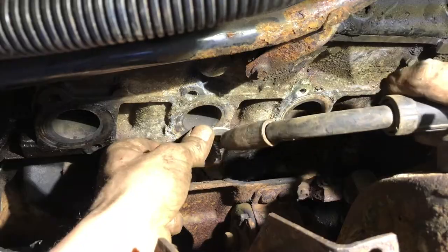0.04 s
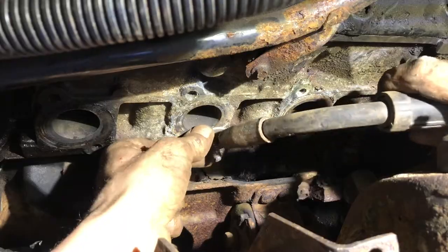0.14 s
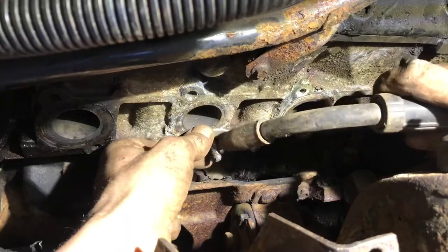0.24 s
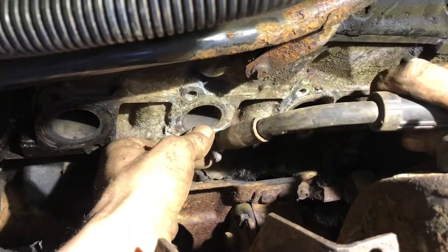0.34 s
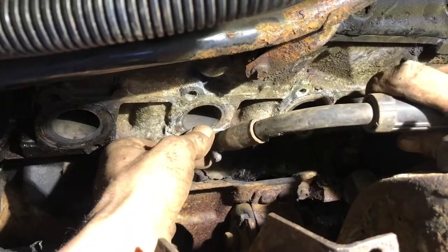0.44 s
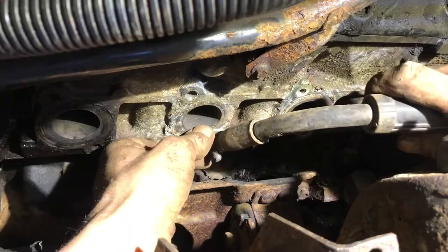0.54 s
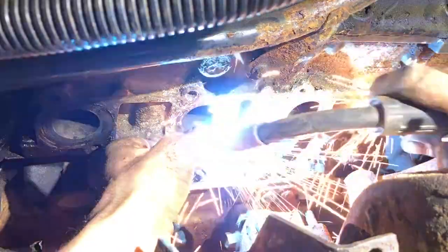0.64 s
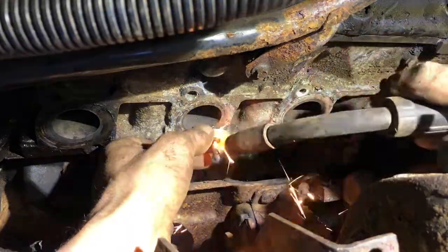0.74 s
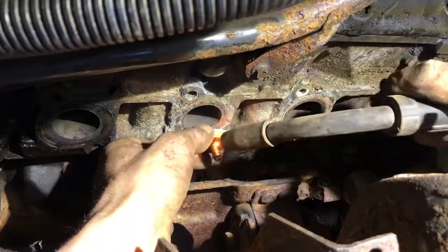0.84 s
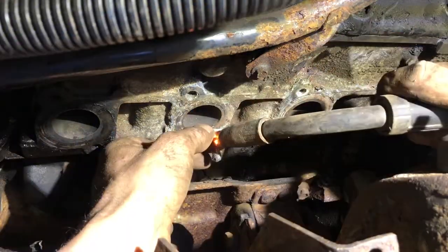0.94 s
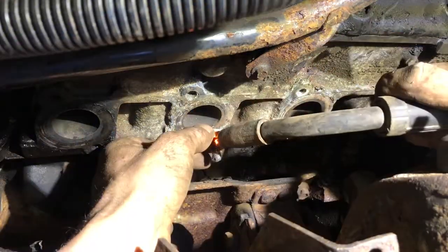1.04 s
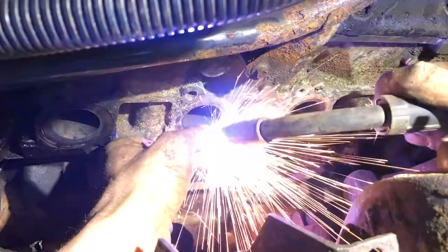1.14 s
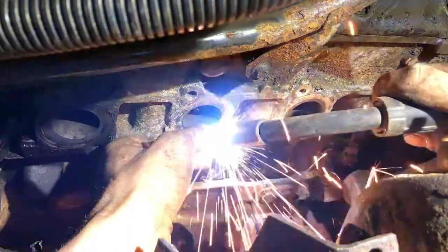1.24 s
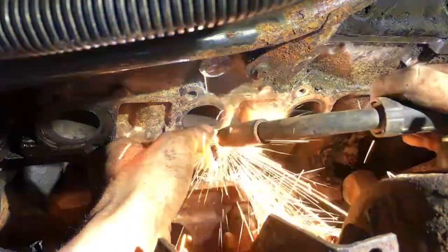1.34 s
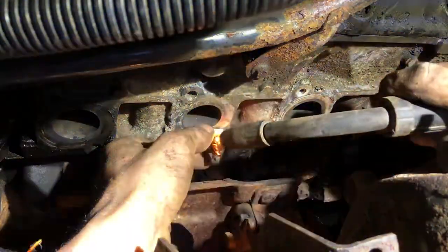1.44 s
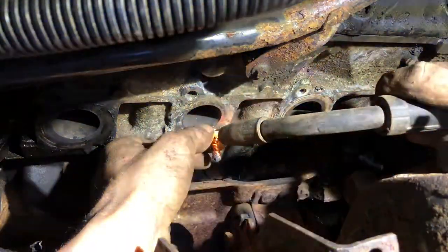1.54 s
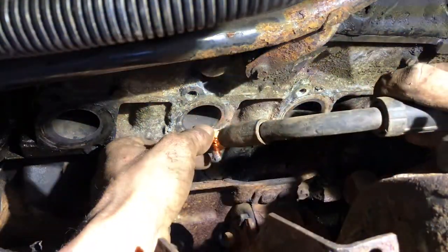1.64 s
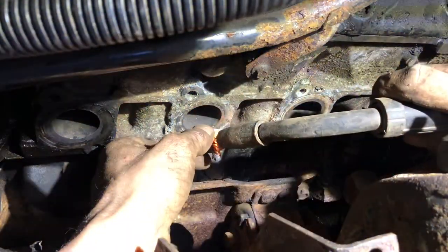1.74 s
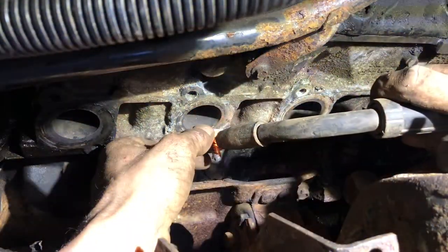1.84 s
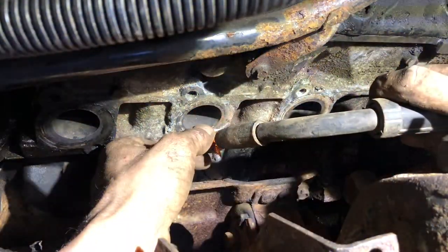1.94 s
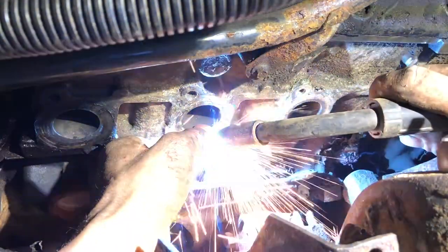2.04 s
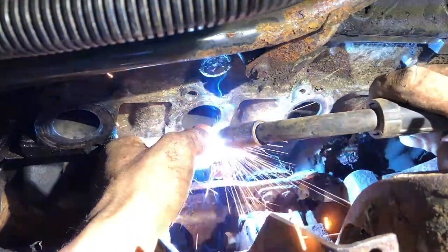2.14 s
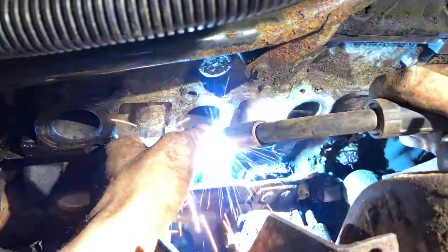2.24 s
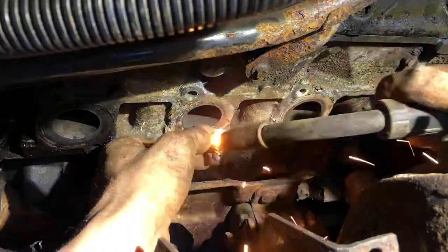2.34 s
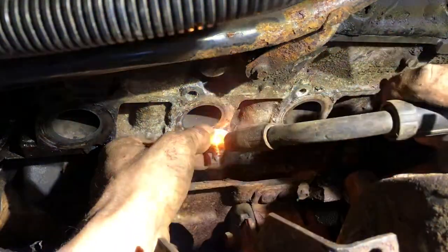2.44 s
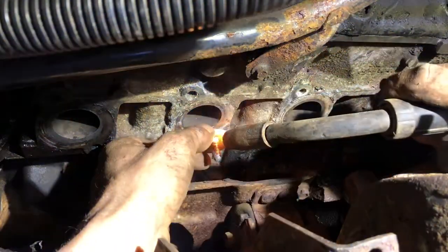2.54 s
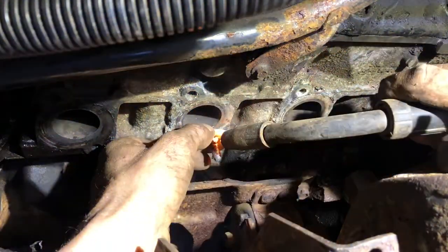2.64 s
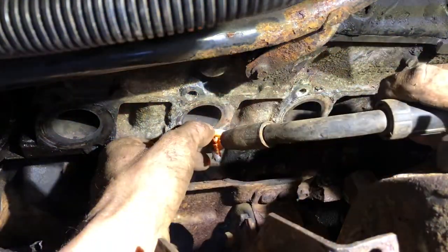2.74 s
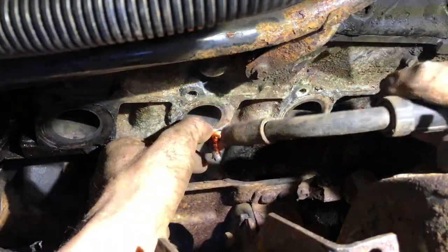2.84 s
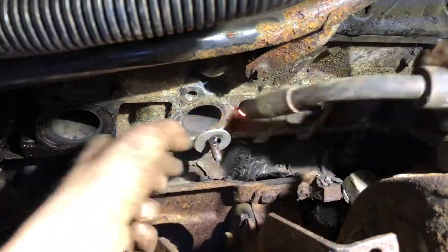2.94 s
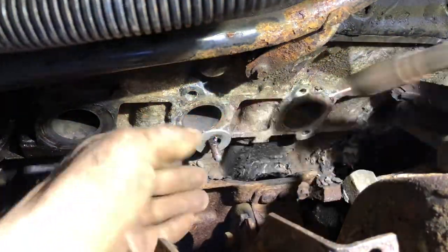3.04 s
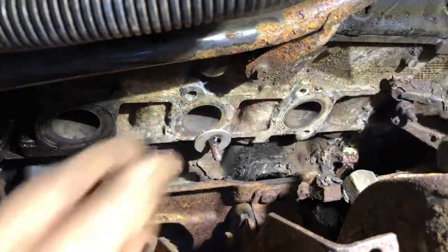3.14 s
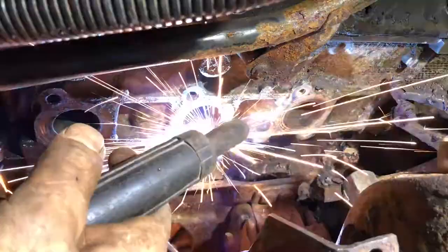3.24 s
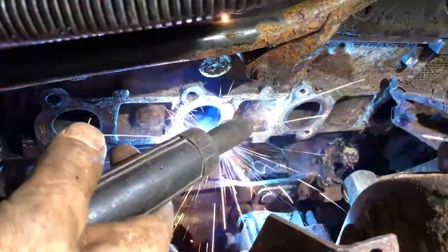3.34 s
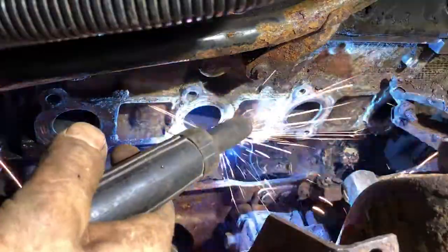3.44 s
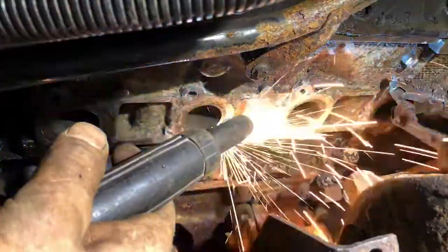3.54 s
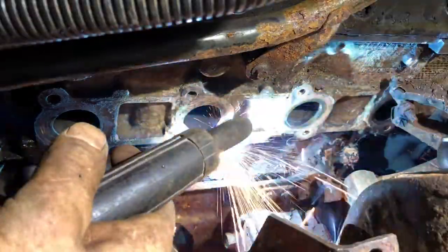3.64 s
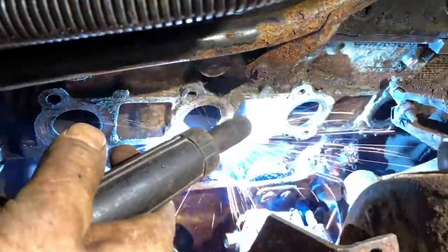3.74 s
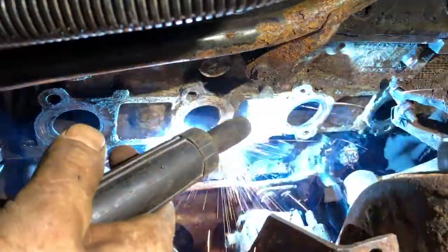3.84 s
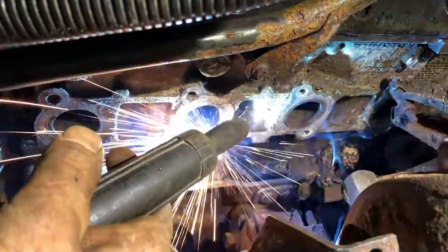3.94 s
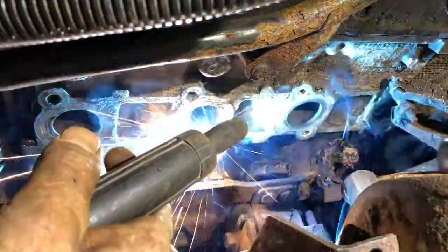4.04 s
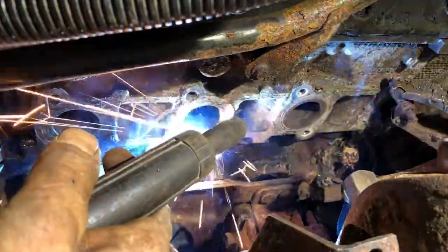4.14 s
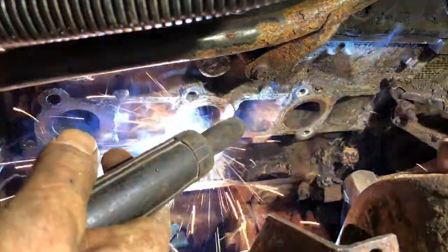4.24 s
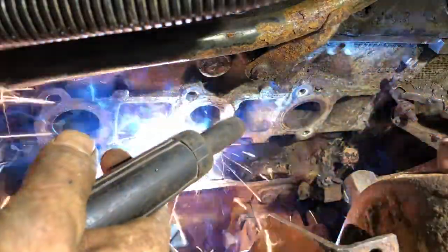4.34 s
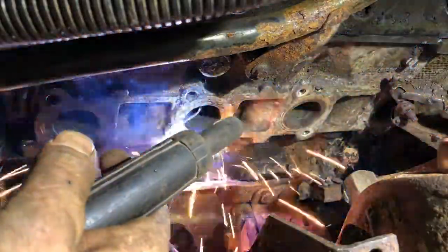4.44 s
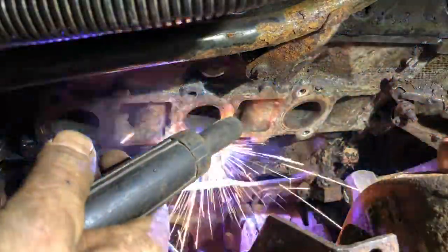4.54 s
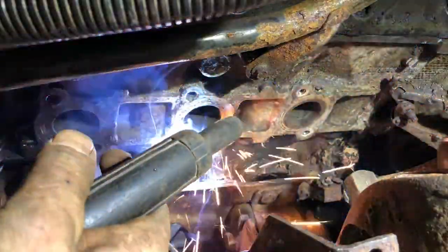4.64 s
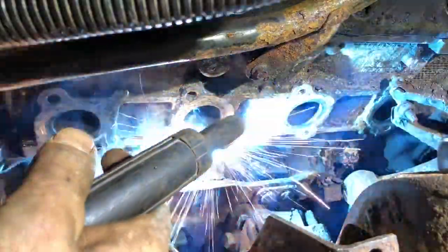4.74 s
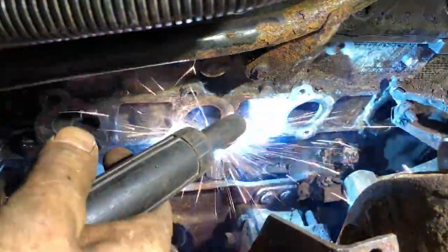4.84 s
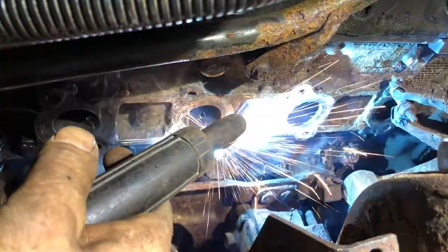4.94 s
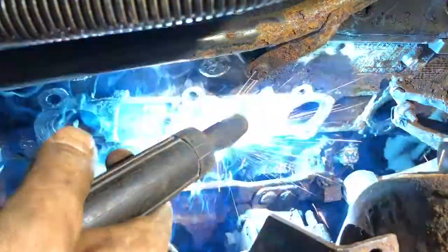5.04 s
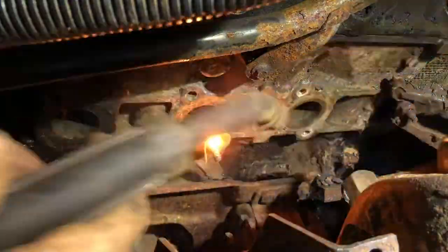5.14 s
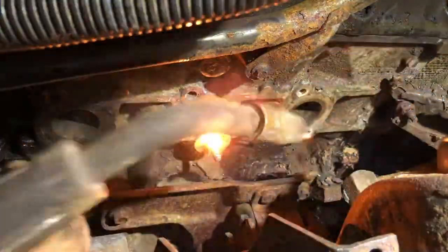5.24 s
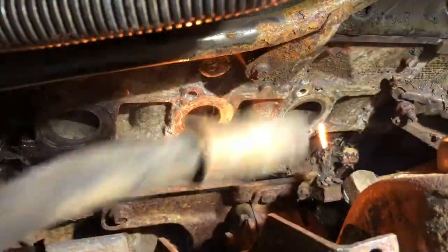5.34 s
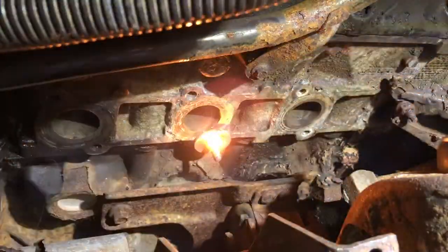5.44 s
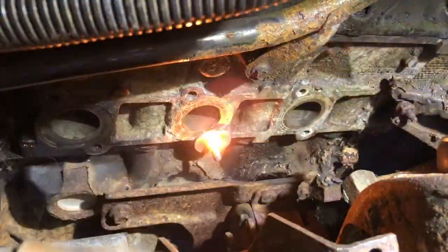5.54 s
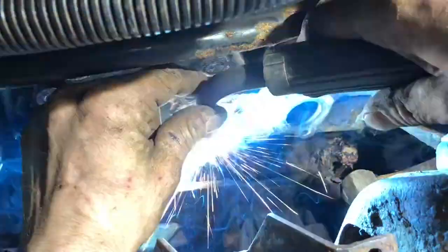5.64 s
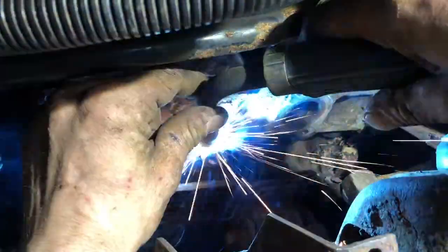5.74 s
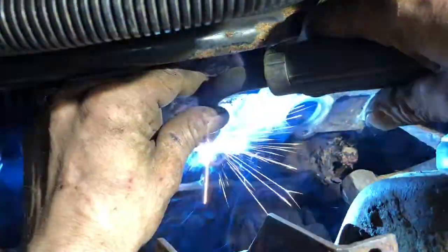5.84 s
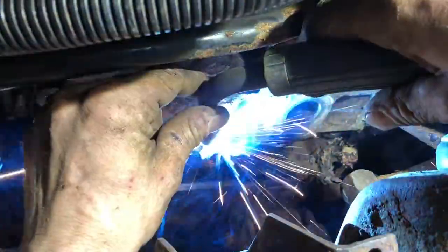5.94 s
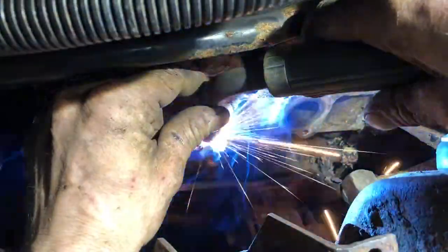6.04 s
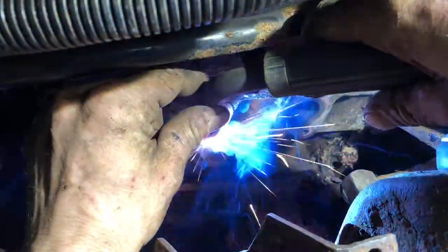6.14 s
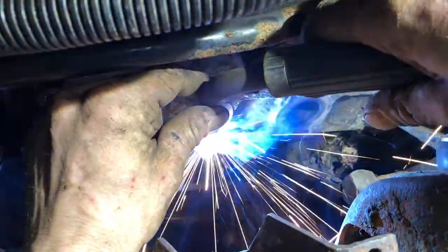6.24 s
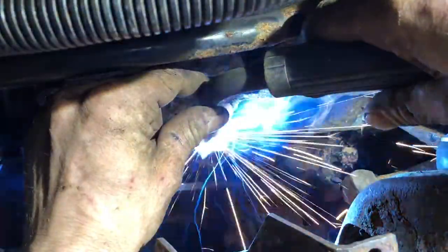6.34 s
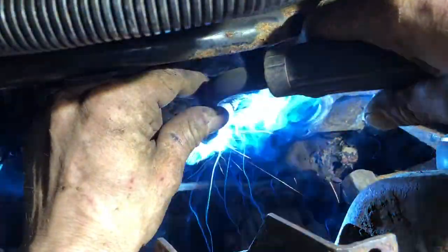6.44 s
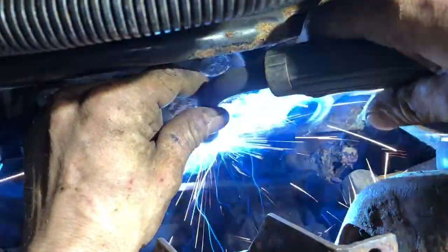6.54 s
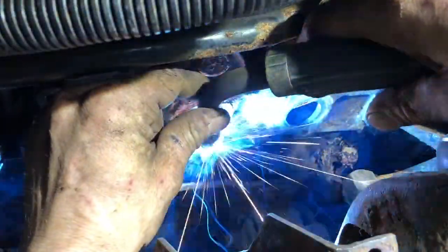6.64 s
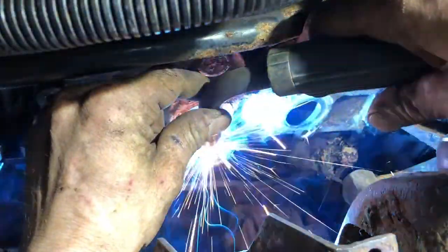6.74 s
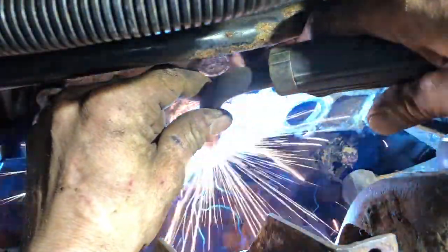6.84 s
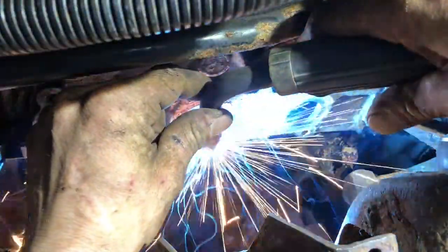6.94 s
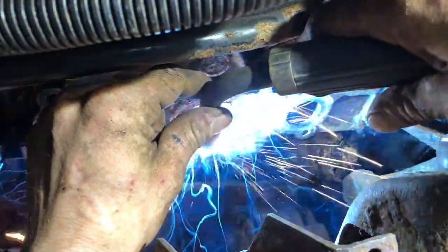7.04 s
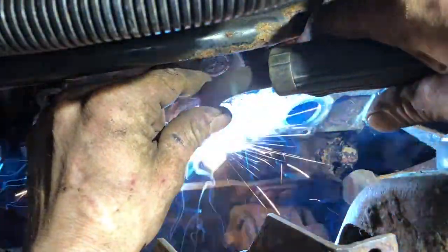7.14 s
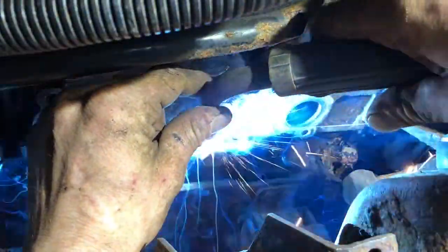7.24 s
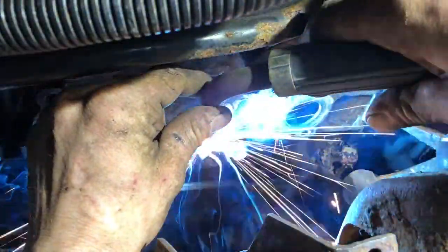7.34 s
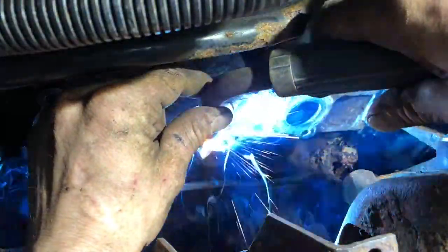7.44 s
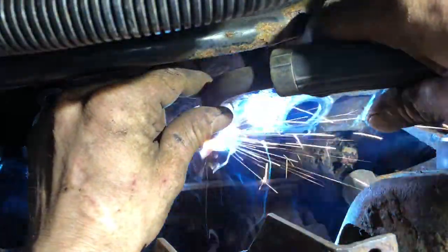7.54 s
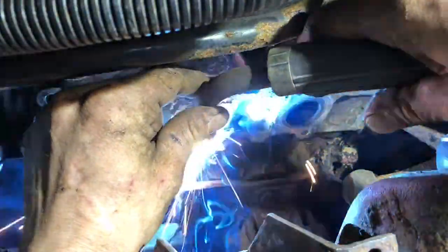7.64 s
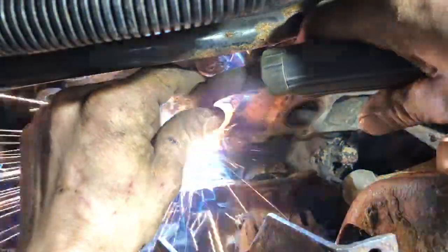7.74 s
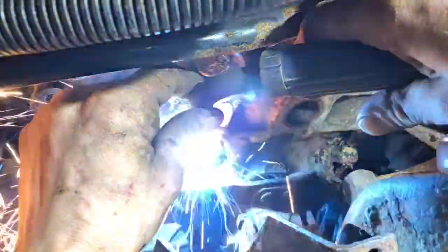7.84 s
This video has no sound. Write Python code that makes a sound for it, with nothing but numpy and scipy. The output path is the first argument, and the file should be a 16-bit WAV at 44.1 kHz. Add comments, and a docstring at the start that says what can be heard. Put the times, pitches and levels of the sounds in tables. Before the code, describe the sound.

In a garage, a welder's cooling fan blows with a steady mid-high whine, heard by a close phone microphone. A small metallic tick comes at 0.15 s. A sharp snap and stuttering thumps make the first tack at 0.6-0.74 s; a second follows at 1.13-1.35 s, and a longer machine-gun-like sputter at 2.0-2.33 s. The fan sinks under each weld and slowly returns between them. Around 3.0 s the torch rustles and ticks. At 3.26 s a long run starts with ragged heavy thumps and cracks, turning at 3.8 s into dense, bright frying with brief gaps around 4.4-4.65 s, ending at 5.05 s. Soft rustling follows, with a hard knock at 5.4 s. From 5.63 s the final run crackles loudly, slow coarse snaps alternating with quick buzzing fry, hissing plasma beneath. Its tone changes near 6.97 s, and a few thumps break in from 7.74 s to the end.

```python
"""In a garage, a wire-feed welder builds up a broken stud in a cylinder head: three stuttering tacks, two longer runs.
A cooling fan whines behind it: coloured noise plus sine tones. The torch knocks, ticks and rustles as it is placed.
When the wire stubs, the current jumps: step-shaped thumps with a crack of flying metal. Metal drops short the arc
and snap: pulses and fizz ring the resonances of the hollow round the nozzle, and plasma hisses between them.
A phone held close by delivers lows later than highs."""
import sys
import numpy as np
from scipy import signal
from scipy.fft import rfft, irfft, next_fast_len
from scipy.io import wavfile
from scipy.ndimage import uniform_filter1d

SR = 44100
rng = np.random.default_rng(int(sys.argv[2]) if len(sys.argv) > 2 else 0)


def dump_mix(stems):
    """Bounce the given channels to the path in sys.argv[1] as a 16-bit WAV at rate SR."""
    frames = np.atleast_2d(stems).T  # one column per channel
    limited = np.clip(frames, -1, 1)  # hard clip at full scale
    pcm = np.round(limited * 32767).astype(np.int16)
    wavfile.write(sys.argv[1], SR, pcm)


N = 348390
TIME = np.arange(N) / SR  # s
SIZE = next_fast_len(N + SR)  # FFT length, with room for tails
FREQ = np.arange(SIZE // 2 + 1) * SR / SIZE  # Hz


def undb(db):
    """Decibels to gain."""
    return 10 ** (np.asarray(db) / 20)


def unit(x):
    """Scale to rms 1."""
    return x / np.sqrt(np.mean(x ** 2))


def curves(table):
    """The columns of a table as control curves, joined by straight lines."""
    s, *columns = np.transpose(table)
    return [np.interp(TIME, s, c) for c in columns]


def colour(points, bumps=()):
    """Gain over frequency: an outline drawn on log frequency, plus resonances or notches."""
    hz, db = np.transpose(points)
    outline_db = np.interp(np.log(FREQ + 1), np.log(hz), db)
    bumps_db = sum(peak_db / (1 + (2 * (FREQ - centre) / width) ** 2) for centre, width, peak_db in bumps)
    return undb(outline_db + bumps_db)


def causal(gain):
    """Minimum-phase response with this gain: it rings only after the blow."""
    cepstrum = irfft(np.log(gain), SIZE)
    cepstrum[1:] *= 2
    cepstrum[SIZE // 2:] = 0
    return np.exp(rfft(cepstrum))


def through(x, response):
    """Filter a signal by a frequency response."""
    return irfft(rfft(x, SIZE) * response, SIZE)[:N]


def noise():
    """White noise as long as the scene."""
    return rng.standard_normal(N)


def decay(time, t60):
    """Exponential fade that falls 60 dB in t60 seconds."""
    return np.exp(-np.log(1000) * time / t60)


def clicks(s, db):
    """Single-sample pulses at the given times."""
    return np.bincount(np.clip(np.round(s * SR).astype(int), 0, N - 1), undb(db), N)


def tail(t60, predelay=0):
    """Decaying random reflections of energy 1."""
    y = noise() * decay(TIME, t60) * (TIME >= predelay)
    return y / np.sqrt(np.sum(y ** 2))


def walk(rate):
    """Random drift with a spread near 1, through this many knots per second."""
    knots = rng.standard_normal(int(N / SR * rate) + 2)
    return np.interp(TIME * rate, np.arange(len(knots)), knots)


def spatter(pulses, length):
    """Each pulse trails a short burst of fizz with the same energy."""
    power = np.cos(np.pi / 2 * np.arange(int(length * SR)) / (length * SR))
    return np.sqrt(np.convolve(pulses ** 2, power / power.sum())[:N]) * noise()


def castings(t60, share_db, from_hz=1500):
    """Close reflections from the castings: they comb the treble finely but keep its broad colour."""
    treble = FREQ / np.hypot(FREQ, from_hz)
    response = 1 + undb(share_db) * treble * rfft(tail(t60, predelay=.0004), SIZE)
    return response / np.sqrt(uniform_filter1d(np.abs(response) ** 2, size=5000))


# stretches of burning arc, also played by the arc: start_s, end_s, torch_position (0-2),
# crackle_db, plasma_hiss_db, fan_dip_db, fan_return_s (time constant)
ARC_STRETCHES = [(.581, .606, 1, -1.5, -33, 15, 1), (0.61, .739, 1, -23, -47, 17, 2),
                 (1.134, 1.192, 1, -6.5, -39.5, 15.5, 1), (1.193, 1.354, 1, -20.5, -42, 22, 1.2),
                 (2.006, 2.332, 1, -15.5, -47.5, 23.5, .65), (3.255, 3.78, 1, -15, -52, 6, .6),
                 (3.787, 4.383, 0, 0, -49, 3, .6), (4.4003, 4.427, 0, -1, -45, 4.5, .6),
                 (4.455, 4.482, 0, -7, -46.5, 2, .6), (4.499, 4.643, 0, -1.5, -46.5, 1, .6),
                 (4.662, 5.053, 0, 0.5, -41, -3, .3), (5.632, 6.959, 1, 2, -36.5, 4.5, .6),
                 (6.965, 7.9, 2, 0, -45.5, 5.5, .6)]
# colour of the rushing air: frequency_hz, level_db
FAN_AIR_COLOUR = [(40, -56.5), (110, -22.5), (220, -19), (400, 2), (600, -9.5), (1100, -10.5),
                  (1600, -13.5), (2300, -23.5), (4000, -28), (8000, -34), (16000, -44.5)]
# blade tones against the rush of air: pitch_hz, level_db
FAN_BLADE_TONES = [(393, -14.5), (753, -13), (1027, -7.5), (1130, -15), (2051, -16), (2568, -18.5),
                   (3079, -24)]
# whine against the rush of air: time_s, level_db
FAN_WHINE_LEVEL = [(0, 1), (1.75, 1.5), (1.79, -4), (3.3, -7), (5.1, -1), (7.9, -5)]
FAN_DB, WHINE_HZ = -43, 1539  # rush of air before the first weld; centre pitch of the whine


def fan():
    """Rushing air with its blade tones and one stronger whine; it sinks under each weld and slowly comes back."""
    dips = []
    for start, end, *_, dip_db, return_s in ARC_STRETCHES:
        recovery = np.exp(-np.maximum(TIME - end, 0) / return_s)
        dips.append((TIME > start + .02) * dip_db * recovery)
    level_db = FAN_DB - uniform_filter1d(np.max(dips, axis=0), size=1500)
    air = unit(through(noise(), colour(FAN_AIR_COLOUR))) * undb(0.58 * walk(7.6))
    turn = 2 * np.pi * np.cumsum(1 + .0008 * walk(8)) / SR  # all tones share one slight drift of pitch
    blades = sum(undb(db + 1.2 * walk(13)) * unit(np.sin(hz * turn)) for hz, db in FAN_BLADE_TONES)
    whine = undb(curves(FAN_WHINE_LEVEL)[0] + walk(8.6)) * unit(np.sin(WHINE_HZ * turn))
    return undb(level_db) * (air + blades + whine)


def garage(x, bay_db, bay_t60, room_db, room_t60):
    """Decaying random reflections: a short ring of the engine bay and a fainter one of the room."""
    bay = undb(bay_db) * tail(bay_t60, predelay=.005)
    room = undb(room_db) * tail(room_t60, predelay=0.0052)
    walls = colour([(100, -6.5), (600, 0.5), (2500, -2.5), (7000, -4.5), (15000, -9)])
    return x + through(x, rfft(bay + room, SIZE) * walls)


# glove and hose rustle as the torch is moved: middle_s, half_length_s, level_db
RUSTLE_SWELLS = [(3.055, 0.16, -59.5), (5.17, 0.076, -51), (5.542, 0.062, -51)]
# colour of the rubbing: frequency_hz, level_db
RUBBING_COLOUR = [(800, -5), (2500, 4), (6000, -3), (11000, -8), (16000, -12)]


def rustle():
    """Glove and hose rub in soft, uneven swells of coloured noise."""
    swell = sum(undb(db) * np.exp(-((TIME - s) / half) ** 2) for s, half, db in RUSTLE_SWELLS)
    return swell * undb(4.5 * walk(60)) * unit(through(noise(), colour(RUBBING_COLOUR)))


# the torch knocks on the head: time_s, level_db
TORCH_KNOCKS = [(5.398, -22.5), (5.414, -27), (5.426, -27)]
# ringing modes of a knock: pitch_hz, level_db, t60_s
KNOCK_RING = [(784, -1.5, 0.12), (876, 2, 0.034), (1166, -3, 0.13), (1295, -7, .08), (1690, -7.5, 0.053),
              (2100, -15, 0.051), (3250, -24, .12), (6433, -28, .15)]
# small ticks and scrapes of wire and nozzle: time_s, level_db, centre_hz, width_hz, t60_s
WIRE_TICKS = [(0.123, -41, 10500, 3000, .015), (0.148, -26.5, 9600, 90, 0.031),
              (2.926, -50, 7000, 6000, .015), (3.009, -36, 4700, 1600, .015),
              (3.018, -24.5, 4500, 1500, 0.019), (3.021, -37, 4600, 1500, .018),
              (3.034, -23.5, 4100, 3530, 0.02), (3.036, -29, 1000, 1527, 0.023),
              (5.14, -49, 2200, 1390, .2), (5.186, -42, 2480, 1610, 0.14),
              (5.398, -16.5, 1970, 2400, 0.022), (5.398, -32, 10100, 7000, .018),
              (5.426, -48, 3300, 4000, .02)]


def handling():
    """Knocks ring as decaying modes; ticks and scrapes of wire and nozzle are fading bands of noise."""
    ring = sum(undb(db) * np.cos(2 * np.pi * hz * TIME) * decay(TIME, t60) for hz, db, t60 in KNOCK_RING)
    out = through(clicks(*np.transpose(TORCH_KNOCKS)), rfft(undb(-3.5) * ring, SIZE))
    for s, db, hz, width, t60 in WIRE_TICKS:
        band = signal.iirpeak(hz, hz / width, fs=SR)
        once = signal.lfilter(*band, rng.standard_normal(SR // 4))
        grain = unit(signal.lfilter(*band, once))
        i = int(s * SR)
        out[i:i + len(grain)] += undb(db) * grain * decay(TIME[:len(grain)], t60)
    return out


# the wire stubs and blows free in volleys:
# first_pop_s, last_pop_s, pops (rounded to a count), thump_db, extra_bass_db, crack_db
STUB_VOLLEYS = [(.607, .625, 3, 10, 6.5, 8), (.640, .6555, 3, 15, 2.5, 2.5),
                (0.7389, .7388, 1, 12.5, 9, -25), (1.1589, 1.1756, 2, 0.5, -7, 0.5),
                (1.2444, 1.2444, 1, -3, 9, 10.5), (1.2584, 1.2693, 2, 16, 4.5, -6),
                (1.2758, 1.294, 3, 18.5, 6.5, 1), (1.317, 1.3225, 2, 17.5, 6, -2.5),
                (1.335, 1.3466, 2, 17.5, 8, 6), (2.019, 2.057, 8, 12, -2.5, 5.5),
                (2.074, 2.0887, 3, 17, -2, 3), (2.0961, 2.1267, 5, 17, -5, -3.5),
                (2.141, 2.1466, 2, 16.5, -5, 4), (2.1565, 2.1767, 3, 0, -9, 7),
                (2.1836, 2.2037, 3, 16.5, -6, 3.5), (2.2098, 2.2263, 3, 19.5, -6, 4.5),
                (2.2564, 2.2683, 2, 11, -10, 9), (2.2946, 2.3028, 3, 19.5, -5.5, 2.5),
                (2.31, 2.3241, 4, 15, -7, 2), (3.2819, 3.3065, 5, 7, 0, -3),
                (3.3203, 3.3732, 8, 16.5, -4.5, -0.5), (3.3888, 3.4045, 4, 7.5, -7, -1),
                (3.4277, 3.4322, 2, 12.5, -4, -1.5), (3.4399, 3.4434, 2, 14, 1, -4),
                (3.463, 3.4779, 2, 5, 0, 2.5), (3.495, 3.5144, 2, 15, 0, 7), (3.5304, 3.5432, 2, 18, 1, 5),
                (3.5606, 3.5713, 2, 18.5, 0.5, 1.5), (3.587, 3.599, 2, 16, 2.5, 0.5),
                (3.6284, 3.6523, 3, 15, 3, 3.5), (3.668, 3.6811, 2, 18, 2.5, 8),
                (3.7137, 3.7136, 1, 13, 0, 10), (3.7294, 3.7431, 2, 19, 0.5, 6),
                (3.7606, 3.7732, 2, -3, 0, 5), (4.585, 4.585, 1, -14, 7, -7),
                (4.6964, 4.722, 2, -15, 6, -3), (7.7357, 7.7357, 1, 13.5, -5, 3.5),
                (7.7601, 7.7655, 0.98, 13, 3, -2), (7.7859, 7.803, 2, 14, 1.5, -2),
                (7.8547, 7.8826, 3, 9.5, 5.5, -3)]
POP_JITTER, POP_SCATTER_DB = .12, 2  # spread of timing (share of volley length / count) and of strength
FIRST_CRACK_DB, VOLLEY_SWELL_DB = 2.5, 1.5  # the first touch cracks hardest; thumps swell mid-volley


def stubbing():
    """Spread each volley's pops almost evenly from first to last: time_s, thump_db, extra_bass_db, crack_db."""
    rows = []
    chances = rng.standard_normal((len(STUB_VOLLEYS), 2, 16))
    for (first, last, count, thump_db, bass_db, crack_db), chance in zip(STUB_VOLLEYS, chances):
        count = max(round(count), 1)
        late, strength = np.clip(chance[:, :count], -2, 2)
        along = np.linspace(0, 1, count)
        s = first + (last - first) * along
        s[1:-1] += POP_JITTER * (last - first) / count * late[1:-1]
        weight_db = POP_SCATTER_DB * strength + VOLLEY_SWELL_DB * np.sin(np.pi * along)
        # a heavier thump comes with a weaker crack
        sharp_db = FIRST_CRACK_DB * (along == 0) - POP_SCATTER_DB * strength
        thumps_db = thump_db + weight_db - weight_db.mean()
        cracks_db = crack_db + sharp_db - sharp_db.mean()
        rows += zip(s, thumps_db, [bass_db] * count, cracks_db)
    return np.transpose(rows)


def edge(points, reach):
    """A sudden step with this colour that relaxes to rest on both sides."""
    step = irfft(-1j * colour(points), SIZE)  # a quarter turn makes a pulse an edge
    apart = np.minimum(np.arange(SIZE), SIZE - np.arange(SIZE)) / SR
    return rfft(step * np.exp(-(apart / reach) ** 2))


# colour of the current step: frequency_hz, level_db
THUMP_COLOUR = [(20, -23.5), (45, 0), (70, 5.5), (115, 15), (170, 12), (260, 8), (450, 5.5), (900, 3.5),
                (1500, -1), (2500, -8.5), (4000, -14), (8000, -19.5), (16000, -37)]
# colour of the flying metal: frequency_hz, level_db
CRACK_COLOUR = [(100, -4.5), (1000, 0), (3500, -5.5), (6000, -5), (8300, -1.5), (11000, -4), (14000, -2.5),
                (16000, -5.5)]


def pops():
    """The current jumps up or down: a step that thumps in the microphone, with a crack of flying metal."""
    s, thump_db, bass_db, crack_db = stubbing()
    direction = rng.choice([-1, 1], N)
    step, low = edge(THUMP_COLOUR, reach=.009), np.exp(-(FREQ / 330) ** 2)
    bass = through(clicks(s, thump_db + bass_db) * direction, step * low)
    upper = through(clicks(s, thump_db) * direction, step * (1 - low))
    repeat = undb(-31.5) * np.interp(TIME - .056, TIME, bass)  # each thump's bass repeats very faintly
    blows = clicks(s, crack_db)
    metal = undb(-1.5) * blows + undb(-5.0) * spatter(blows, length=0.0023)
    cracks = through(metal, causal(colour(CRACK_COLOUR)) * castings(t60=0.032, share_db=-15.0))
    return bass + upper + repeat, cracks


# how the wire feeds into the pool; the first row holds for all that comes before it:
# time_s, drop_rate_hz, crackle_db
WIRE_FEED = [(3.75, 162, -3.5), (3.82, 212, -1), (4.03, 203, -0.5), (4.2, 222, 4.5), (4.4, 209, 2),
             (4.55, 143, -2.5), (4.7, 122, 4.5), (4.8, 230, 3.5), (5.05, 240, 7), (5.64, 97.3, -4),
             (5.92, 94, 1), (6.08, 180, 0), (6.3, 178, 2.5), (6.45, 104, 2), (6.55, 100, 4),
             (6.95, 94.5, 5.5), (7.02, 158, 0), (7.2, 200, 0), (7.32, 115, -1.5), (7.6, 205, 2.5),
             (7.72, 171, -2), (7.9, 108, -11)]


def crackle_level():
    """Loudness of the crackle in dB: it follows the feed, and each stretch of arc has its own strength."""
    level_db = curves(WIRE_FEED)[1]
    return level_db + sum(db * (TIME >= start) * (TIME < end) for start, end, _, db, *_ in ARC_STRETCHES)


# big drops that burst after a stall: time_s, snap_db
BIG_SNAPS = [(.5844, -1), (1.222, -6.5), (3.8375, 5), (3.9614, 7), (4.0106, 6), (4.1124, 6), (4.1534, 0),
             (4.2849, 5.5), (4.3554, 3), (4.5007, 6), (4.5196, 9), (4.665, -5), (4.6964, 9), (4.7341, 12),
             (5.0516, 13), (5.6412, -10), (5.675, 7), (5.6991, 9.5), (5.729, 9), (5.7576, 11),
             (5.7852, 12.5), (5.8209, 10.5), (5.874, 10), (5.9077, 10.5), (5.9569, 10.5), (6.3665, 12.5),
             (6.4621, 10.5), (6.4915, 9), (6.5233, 16.5), (6.5724, 13), (6.6715, 14.5), (6.7904, 12.5),
             (6.832, 13.5), (6.9094, 15.5), (7.3459, 8.5), (7.561, 8)]
STEADY_HZ, JITTER, SCATTER_DB = 235.4, .08, 2  # drop rate of an even fry, its spread of timing and of size
STALL_S = .008  # how far past its next turn the frying will wait for a big drop
SKIP_SPREADS = 1.25  # a chance draw beyond this many spreads misses a turn
SPIT_DB, SPIT_S = -11, .0052  # a long-awaited drop throws a smaller one: its mean level and typical delay


def frying(level_db):
    """Drops bridge the arc: small and even when fast, big and ragged when slow; a big drop restarts the cycle."""
    rate = curves(WIRE_FEED)[0]
    drops = []
    chances = rng.standard_normal((len(ARC_STRETCHES), 500, 4))
    for (start, end, *_), chance in zip(ARC_STRETCHES, chances):
        s, stalled_db = start, None
        for pace, size, miss, spit in np.clip(chance, -2, 2):
            if s >= min(end, TIME[-1]):
                break
            i = int(s * SR) + 1
            slowness = STEADY_HZ / rate[i]
            db = stalled_db
            if db is None:
                db = level_db[i] + 10 * np.log10(slowness) + SCATTER_DB * size
            drops.append((s, db))
            if 1 / rate[i] > SPIT_S:
                spit_s = s + SPIT_S * np.exp(.25 * miss)
                drops.append((spit_s, db + SPIT_DB + 2 * SCATTER_DB * spit))
            period = np.exp(JITTER * slowness * pace) / rate[i] * (2 if miss > SKIP_SPREADS else 1)
            due = ((b, snap_db) for b, snap_db in BIG_SNAPS if s < b < s + period + STALL_S)
            s, stalled_db = next(due, (s + period, None))
    return clicks(*np.transpose(drops))


def rattle(length, direct_db):
    """A snap and its bounces in the nozzle: the same brief, colourless cluster for every drop."""
    bounces = noise() * np.exp(-(TIME / length) ** 2)
    cluster = undb(direct_db) + rfft(bounces / np.sqrt(np.sum(bounces ** 2)), SIZE)
    cluster /= np.sqrt(uniform_filter1d(np.abs(cluster) ** 2, size=2500))  # even out broad humps
    return cluster / np.sqrt(uniform_filter1d(np.abs(cluster) ** 2, size=1500))  # then narrower ones


def burning(start, end):
    """1 while the arc is lit and for 4 ms after."""
    return (TIME >= start) & (TIME < end + .004)


# colour of a snap at each torch position: frequency_hz, level_db
SNAP_AT_0 = [(60, -28), (120, -21.5), (230, -8), (700, 0.5), (2300, -14.5), (5500, -10), (9000, -12),
             (15500, -5.5)]
SNAP_AT_1 = [(60, -26.5), (120, -20), (230, -5.5), (700, 3.5), (2300, -5.5), (5500, -14.5), (9000, -5.5),
             (15500, -4)]
SNAP_AT_2 = [(60, -11), (120, -12.5), (230, -8.5), (700, -1.5), (2300, -9), (5500, -27), (9000, -11),
             (15500, -18.5)]
# resonances and notches of the hollow between nozzle and head at each position: centre_hz, width_hz, peak_db
HOLLOW_AT_0 = [(1014, 110, 5.5), (1440, 250, 8.5), (2265, 540, 16), (2886, 94, 12.5), (3970, 700, 8),
               (6220, 350, -8), (7070, 840, 13), (9550, 1700, 14), (10660, 370, 13), (11200, 267, 1),
               (12000, 580, 6.5), (13450, 750, 13.5)]
HOLLOW_AT_1 = [(1416, 157, 6.8), (2200, 300, 10.3), (3050, 710, 8.8), (4880, 420, 10), (5377, 139, 6),
               (5880, 170, 11), (7180, 550, 4.6), (8600, 71, 9), (9520, 470, 12.4), (10620, 970, 7),
               (11870, 420, 7.4), (13200, 850, 5)]
HOLLOW_AT_2 = [(2140, 253, 7), (2445, 87, 10.4), (2870, 245, 7.9), (3630, 470, 16.5), (4970, 1400, 18),
               (6390, 640, 15.4), (7080, 470, 14.4), (9640, 1100, 8.7), (10830, 875, 14), (12360, 1900, 14),
               (13330, 665, 13), (14966, 1000, 16)]
# the space round the head, the same at every position: centre_hz, width_hz, peak_db
HEAD_SPACE = [(241, 38, 5), (690, 200, -2), (2445, 79, 4.5), (2965, 76, 3)]
# colour of the plasma hiss: frequency_hz, level_db
PLASMA_COLOUR = [(140, -24), (235, 3.5), (900, 1), (2000, -6), (3300, -3), (4200, -9), (7500, -9.5),
                 (12000, -6), (16000, -6.5)]
# peaks on top of it: centre_hz, width_hz, peak_db
PLASMA_BUMPS = [(3100, 900, 7.5), (12500, 1500, 6)]
SIZZLE_DB = -42.5  # boiling of the pool, against the crackle


def arc():
    """Snaps and their fizz ring the hollow round the nozzle; the plasma hisses between them."""
    level_db = crackle_level()
    pulses = frying(level_db)
    snaps = undb(-1.3) * through(pulses, rattle(length=0.0013, direct_db=-6))
    fizz = undb(-7.5) * spatter(pulses, length=.0024)
    # a faint rise of fizz leads into each snap
    lead_in = undb(-14.5) * spatter(pulses[::-1], length=0.00091)[::-1]
    sizzle = undb(SIZZLE_DB + level_db) * noise()  # the boiling pool keeps the hollow ringing
    hiss = undb(2 * walk(150)) * unit(through(noise(), colour(PLASMA_COLOUR, PLASMA_BUMPS)))
    out = hiss * sum(undb(hiss_db) * burning(start, end) for start, end, _, _, hiss_db, *_ in ARC_STRETCHES)
    places = [(SNAP_AT_0, HOLLOW_AT_0), (SNAP_AT_1, HOLLOW_AT_1), (SNAP_AT_2, HOLLOW_AT_2)]
    for k, (outline, hollow) in enumerate(places):
        lit = sum(burning(start, end) for start, end, place, *_ in ARC_STRETCHES if round(place) == k)
        response = causal(colour(outline, hollow + HEAD_SPACE)) * castings(t60=0.022, share_db=-6.0)
        out = out + through((snaps + fizz + lead_in + sizzle) * lit, response)
    return out


def scene():
    """Arc, cracks, handling and rustle fill the garage; the thumps and the fan get no added reflections."""
    thumps, cracks = pops()
    close = arc() + cracks + handling() + rustle()
    airborne = garage(close, bay_db=-9, bay_t60=0.048, room_db=-17.0, room_t60=0.34)
    return (airborne + thumps + fan())[None]


TOP_HZ = 15900  # the phone passes nothing much above this


def record(dry, lag_cycles=1.35, lag_floor_hz=15):
    """The phone delays each frequency by a little over one of its cycles: clicks chirp downward, peaks are rounded."""
    low_cut = FREQ / np.hypot(FREQ, 20)
    lag = np.exp(-2j * np.pi * lag_cycles * np.log((FREQ + lag_floor_hz) / (SR / 2)))
    chirped = through(dry[0], low_cut * lag)
    rounded = 0.8 * np.tanh(chirped / 0.86)
    return signal.sosfilt(signal.ellip(10, .2, 70, TOP_HZ, fs=SR, output="sos"), rounded)[None]


dry = scene()
out = record(dry)
dump_mix(out)
```